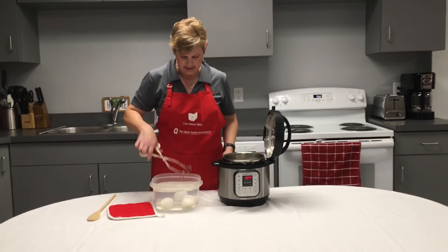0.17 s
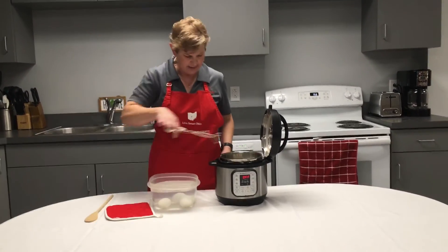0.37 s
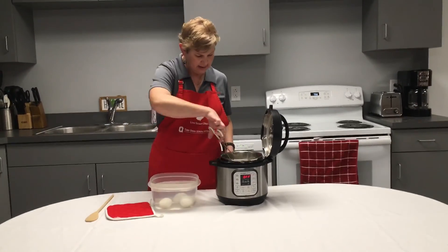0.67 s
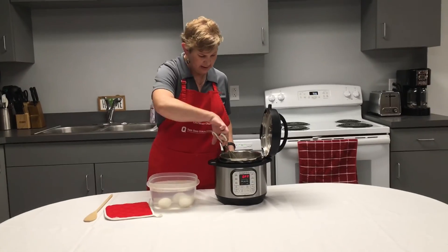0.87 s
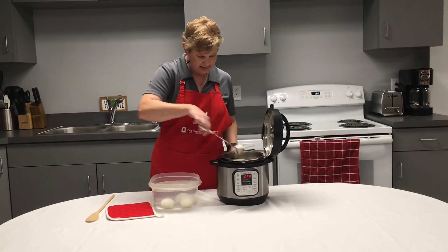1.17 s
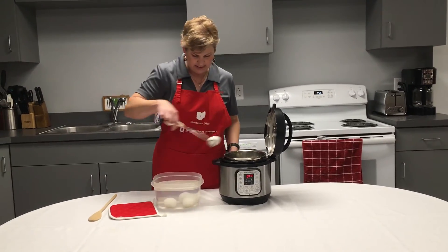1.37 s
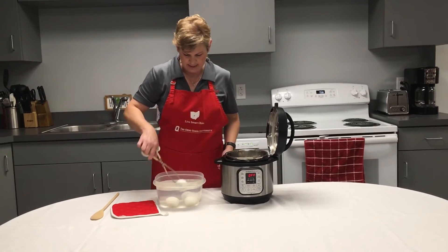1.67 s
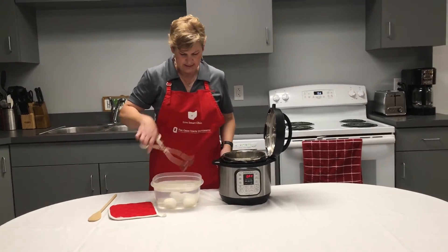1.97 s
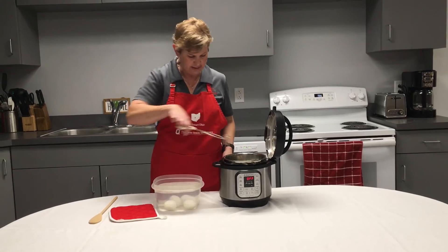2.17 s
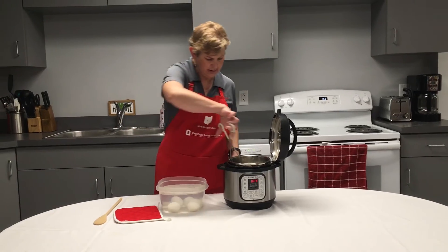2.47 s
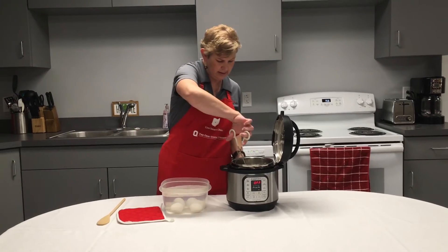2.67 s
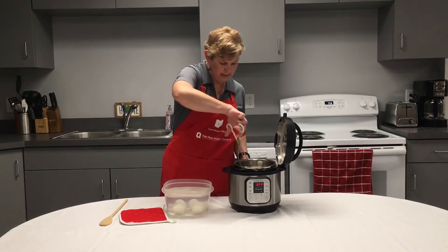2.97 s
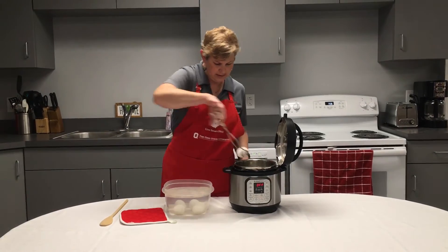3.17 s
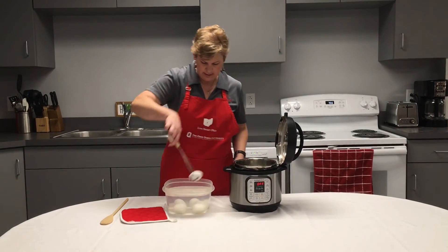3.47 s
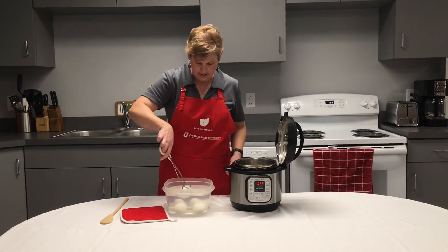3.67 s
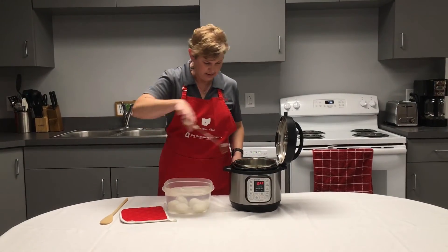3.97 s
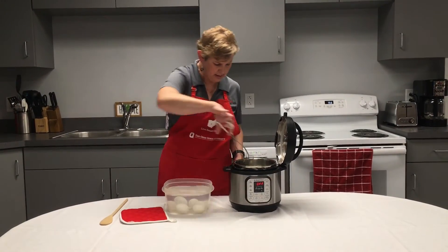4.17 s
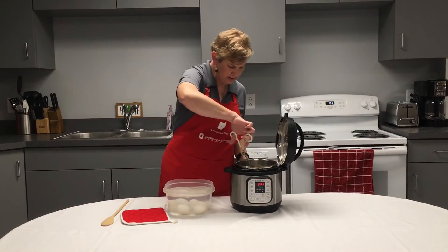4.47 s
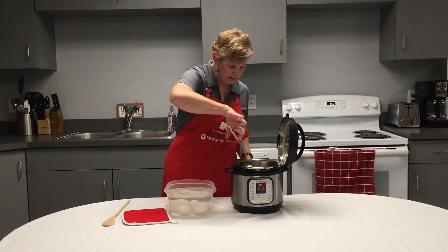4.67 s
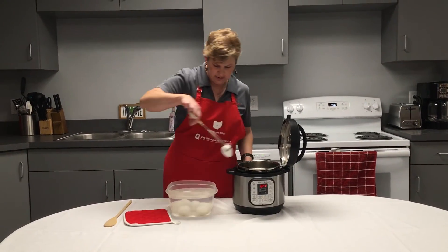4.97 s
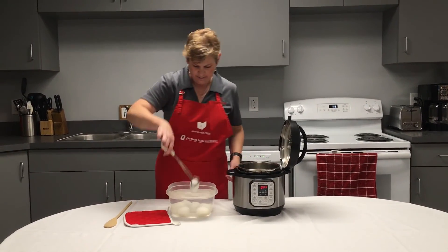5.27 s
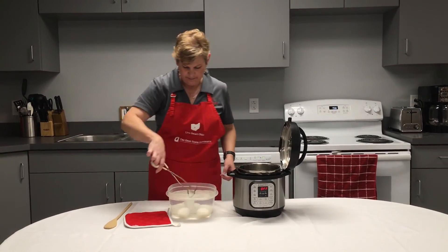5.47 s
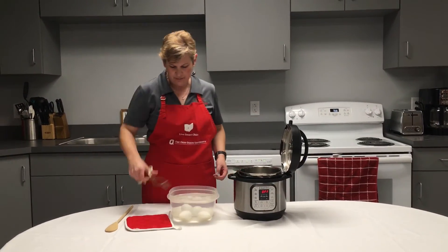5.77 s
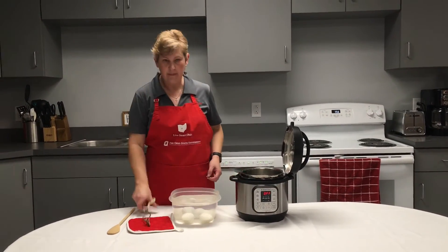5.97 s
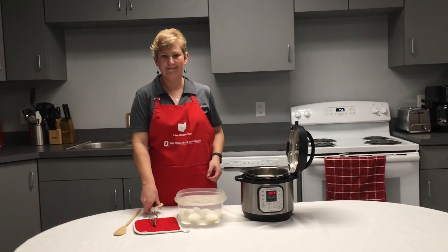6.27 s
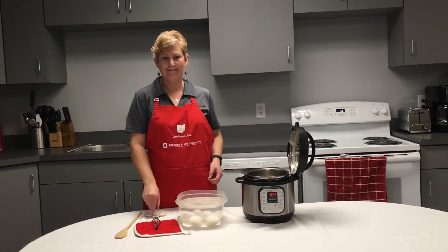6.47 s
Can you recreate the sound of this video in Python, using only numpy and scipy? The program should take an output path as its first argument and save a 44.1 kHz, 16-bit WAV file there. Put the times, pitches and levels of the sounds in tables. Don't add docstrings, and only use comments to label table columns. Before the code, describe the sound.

A low ventilation hum with fuzzy duct tones, soft hiss and a very thin whine runs throughout, in a hard-walled kitchen heard through a small microphone a few metres off. At 0.4 s an egg clicks into a plastic tub of water and rocks, with a soft boom from the table. From 0.75 to 1.1 s steel tongs rattle brightly on a wire rack in a metal pot. A second egg knocks down at 2.2 s. Light scraping at 2.6 s leads to a sharp, ringing clank at 2.7 s, with small settling clinks until 3 s. Faint drips and ticks follow. The third egg lands harder at 4 s; a faint scrape comes around 4.5 s. The last egg drops at 5.65 s with the deepest boom. At 5.8 s the tongs snap shut crisply. At 6.46 s they thud loudly onto the table, arms bouncing and dulling in a quick clatter.

```python
import sys
import numpy as np
from scipy import signal
from scipy.fft import rfft, irfft, next_fast_len
from scipy.io import wavfile
from scipy.ndimage import uniform_filter1d

SR = 44100
rng = np.random.default_rng(int(sys.argv[2]) if len(sys.argv) > 2 else 0)


def unload_wav(signal):
    wavfile.write(
        sys.argv[1],
        SR,
        np.round(np.clip(np.atleast_2d(signal).T, -1, 1) * 32767).astype(np.int16),
    )


def level_to_linear(level):
    exponent = np.asarray(level, float) / 20
    return 10 ** exponent


N = 291942
SPAN = 2 ** 14
HZ, T = np.fft.rfftfreq(2 * SPAN, 1 / SR), np.arange(SPAN) / SR

# frequency [Hz], gain [dB]
MIC_RESPONSE = [(300, 2.5), (4200, -0.5), (4900, -6.5), (5600, 0), (9600, 2.5), (10300, -5.5), (11000, 2),
                (15750, -2.5), (16150, -32), (16600, -42), (17000, -92)]


def unit(x):
    return x / np.sqrt(np.mean(x ** 2) + 1e-20)


def along(points, hz):
    point_hz, value = np.transpose(points)
    return np.interp(np.log(hz + 1), np.log(point_hz + 1), value)


def shaped(x, response):
    return irfft(rfft(x, 2 * SPAN) * response)[:SPAN]


def add(track, start_s, sound):
    piece = track[round(start_s * SR):][:SPAN]
    piece += sound[:len(piece)]


def resonances(peaks, damping):
    centre, width, db = np.transpose(peaks)[:, :, None]
    sign = (-1.) ** np.arange(len(peaks))[:, None]
    loss = 1j * HZ * width * damping
    return sign * level_to_linear(db) * loss / (centre * centre - HZ * HZ + loss)


def struck(modes):
    scatter_db = 2.5 * rng.standard_normal((len(modes), 1))
    return (level_to_linear(scatter_db) * modes).sum(axis=0)


def echo():
    # frequency [Hz], t60 [s]
    kitchen = [(200, 0.92), (700, 0.38), (1500, 0.25), (3000, 0.27), (6000, 0.23), (10000, 0.18),
               (15000, 0.2)]
    _, t, z = signal.stft(rng.standard_normal(SPAN), SR, nperseg=256)
    hz = np.fft.rfftfreq(256, 1 / SR)
    decay = level_to_linear(-60 * t / along(kitchen, hz)[:, None])
    tail = signal.istft(z * decay, SR, nperseg=256)[1][:SPAN] * (T > .006)
    return rfft(tail / np.linalg.norm(tail), 2 * SPAN)


def blow(edges_hz, levels_db, t60, body, rise, crack):
    grain = level_to_linear(2.5 * np.repeat(rng.standard_normal(SPAN // 64), 64))
    swell = grain * level_to_linear(-60 * T / np.clip(t60, .002, 1)) * (1 - np.exp(-T / rise))
    out = np.zeros(SPAN)
    for low_hz, high_hz, db in zip(edges_hz, edges_hz[1:], levels_db):
        band = signal.butter(2, [low_hz, high_hz], "bandpass", fs=SR)
        force = swell * rng.standard_normal(SPAN) + crack * (T == 0)
        part = shaped(signal.lfilter(*band, force), body)
        out += level_to_linear(db) * part / np.abs(part).max()
    return out


def steel(events, peaks, damping, dense_db, room_db, rise, crack):
    edges_hz = (300, 2000, 4500, 10500, 17000)
    out, modes = np.zeros(N), resonances(peaks, damping)
    for s, db, low_db, mid_db, top_db, t60 in events:
        body = struck(modes) + level_to_linear(dense_db)
        hit = blow(edges_hz, db + np.array([low_db, mid_db, 0, top_db]), t60, body, rise, crack)
        add(out, s, hit + level_to_linear(room_db) * shaped(hit, echo()))
    return out


def knocks(events, peaks, order, damping, dense_db, room_db, crack):
    edges_hz = (200, 850, 2000, 4500, 17000)
    out, modes = np.zeros(N), resonances(peaks, damping)
    for s, db, low_db, mid_db, top_db, t60 in events:
        body = struck(modes) ** order + level_to_linear(dense_db)
        hit = blow(edges_hz, db + np.array([low_db, 0, mid_db, top_db]), t60, body, 0.00009, crack)
        add(out, s, hit + level_to_linear(room_db) * shaped(hit, echo()))
    return out


def ringing(notes, rise=0.0012):
    out = np.zeros(N)
    fade = np.cos(np.pi * T / T[-1] / 2)
    for s, hz, db, t60 in notes:
        swell = 1 - np.exp(-(T / rise) ** 2)
        add(out, s, level_to_linear(db - 60 * T / t60) * swell * fade * np.sin(2 * np.pi * hz * T))
    return out


def rack_contacts(rows, peaks, mid_db, top_db, dense_db, room_db, rise):
    wall_fills, wall_dulls = 0.29, 0.43
    events = [(s, db, wall, mid_db + wall_fills * wall, top_db - wall_dulls * wall, t60)
              for s, db, wall, t60 in rows]
    return steel(events, peaks, 1.9, dense_db, room_db, rise, crack=.1)


def pot_and_rack():
    # start_s [s], level_db at 4.5-10 kHz [dB peak], pot_wall_share [dB], t60 [s]
    reach = [(0.7392, -29.5, 2.5, 0.033), (0.7482, -23, -20, 0.14), (0.7641, -27, -9, 0.048),
             (0.8254, -28.5, -20, 0.1), (0.8707, -30, -16, 0.1), (0.893, -33, -23, 0.06),
             (.845, -36, -8, 0.068)]
    grip = [(0.9327, -25, -16.5, 0.083), (0.962, -20.5, -17.5, 0.042), (0.9765, -40, -22, 0.052),
            (1.0312, -17.5, -19.5, 0.047), (1.0403, -24, -17, 0.057), (1.0515, -26, -8.5, 0.077)]
    slide = [(2.5864, -45, 7, 0.08), (2.596, -38.5, -8, 0.032), (2.6382, -44.5, 8.5, 0.06),
             (2.652, -51, 7, 0.045)]
    clank = [(2.6825, -14, -18.5, 0.025), (2.6865, -17, -25, 0.02), (2.693, -17, -33, 0.03),
             (2.6985, -18.5, -12.5, 0.044), (2.706, -20, -12.5, 0.033), (2.74, -37, -1.5, 0.39)]
    settle = [(2.843, -43, 3.5, .03), (2.8498, -30.5, -3.5, 0.072), (2.866, -39, 0, 0.071),
              (2.8841, -35, -6, 0.051), (2.898, -42, -8, 0.054), (2.9103, -44, 3, 0.078),
              (3.0118, -43.5, -6, 0.024), (3.0153, -39.5, -4.5, .04)]
    scrape = [(4.4544, -46, 2, 0.03), (4.462, -31, -12, 0.1), (4.4804, -35.5, 1, 0.045),
              (4.5044, -51, 0, 0.031), (4.5594, -59, 11.5, 0.044)]
    # pitch_hz [Hz], width_hz [Hz], level_db [dB]
    reach_modes = [(1760, 73, -3.5), (2140, 340, -4), (3244, 51, 3.5), (4400, 89, 1.5), (4910, 27, 1),
                   (5200, 19, 1), (5690, 12, 2), (6030, 28, 2), (6500, 47, -7), (7360, 47, -6),
                   (7880, 32, -2), (8160, 250, -3.5), (9160, 27, -12), (8840, 29, -12), (10400, 30, -14),
                   (11400, 43, -4), (12200, 58, -15), (12700, 35, -12), (13300, 27, -7), (13900, 60, -12)]
    grip_modes = [(2570, 140, 0.5), (2930, 100, -1), (3510, 64, -0.5), (4100, 110, -20), (5300, 31, -7),
                  (5470, 50, -16), (6130, 70, -2), (7340, 150, -21), (8400, 30, 0), (8520, 50, -7),
                  (9050, 88, -1), (9160, 37, -12), (9600, 220, -1.5), (10800, 48, -4), (11100, 53, -4),
                  (11600, 35, -1), (11900, 22, -10), (13000, 72, -10), (14000, 55, -11), (14400, 140, 0),
                  (15200, 38, -17)]
    slide_modes = [(965, 11, -18), (1395, 36, 3), (1770, 19, -23), (1960, 90, -9), (2900, 100, -1),
                   (3410, 24, 3), (4300, 23, -4), (5400, 47, -8), (5640, 85, -7), (6300, 39, -7),
                   (7080, 36, -6), (7500, 160, -6), (7740, 29, -16), (8600, 37, 1), (9150, 55, -17),
                   (10700, 37, -13)]
    clank_modes = [(554, 11, -15), (1640, 45, -10), (2700, 150, -4), (3470, 36, 1), (4030, 14, -8),
                   (5370, 28, 1.5), (5530, 24, -7), (6100, 60, -5), (6550, 29, -22), (7150, 33, -10),
                   (7340, 17, 1), (7560, 30, -7), (8200, 33, -6), (8800, 270, 0), (10100, 63, -3),
                   (11100, 32, -15), (11440, 46, -3), (11300, 20, -14), (11500, 31, -7), (11800, 32, -11),
                   (13000, 48, -15), (13000, 28, -9), (13700, 60, -9), (14800, 29, -12)]
    settle_modes = [(965, 20, -12), (1404, 19, 3), (1960, 83, -15), (2900, 100, 4.5), (3360, 32, 0),
                    (4600, 51, 6), (5780, 85, -2), (6200, 39, -6), (7300, 92, -7), (8700, 60, 0),
                    (9200, 63, -5), (11300, 80, -4)]
    scrape_modes = [(880, 10, 0), (1377, 16, 8), (2400, 120, -5), (3900, 110, -5.5), (5560, 110, 2.5),
                    (6460, 41, -4), (6460, 42, -17), (7370, 61, 2.5), (8200, 32, -2), (8480, 46, 2),
                    (9200, 140, -1), (10800, 34, -10), (11300, 50, -2), (13800, 50, -14)]
    # start_s [s], pitch_hz [Hz], level_db
    # [dB], t60 [s]
    wall_notes = [(0.744, 1760, -53, 0.24), (.745, 319, -39, 0.19), (.745, 740, -31.5, 0.038),
                  (.745, 2140, -30, 0.046), (.743, 3150, -40, 0.27), (.75, 3360, -39, .3),
                  (.828, 3330, -53, 0.18), (.83, 4860, -36, .15), (.875, 3160, -42, 0.17),
                  (.934, 3410, -44, 0.2), (1.033, 7340, -30, 0.11), (1.033, 8360, -36, .1),
                  (.94, 568, -47.5, 0.46), (1.034, 285, -32.5, 0.13), (1.04, 2900, -41, 0.28),
                  (2.59, 350, -41, 0.17), (2.59, 880, -48.5, 0.53), (2.69, 1746, -40, 0.59),
                  (2.69, 2930, -43, .3), (2.69, 6072, -39, .28), (2.69, 7165, -37, .21),
                  (2.69, 7500, -46, 0.36), (2.69, 8199, -29, 0.16), (2.69, 11600, -27, 0.13),
                  (2.69, 3500, -41, 0.49), (2.686, 567, -35.5, 0.26), (2.686, 1500, -48, 0.5),
                  (2.684, 5470, -23.5, 0.085), (2.855, 976, -47, 0.72), (2.855, 1716, -52, 0.87),
                  (3.812, 3250, -50, .14), (5.82, 2770, -43, .15), (5.82, 3930, -45, .12),
                  (4.57, 665, -43.5, 0.086)]
    out = ringing(wall_notes)
    out += rack_contacts(reach, reach_modes, -0.9, -15.5, dense_db=-8.5, room_db=-1.5, rise=0.00087)
    out += rack_contacts(grip, grip_modes, -7, -15, dense_db=-5.5, room_db=-1.0, rise=0.0013)
    out += rack_contacts(slide, slide_modes, -9.0, -18, dense_db=-8.5, room_db=-1.5, rise=0.003)
    out += rack_contacts(clank, clank_modes, -6.5, -13, dense_db=-8.0, room_db=-2.0, rise=0.0035)
    out += rack_contacts(settle, settle_modes, -1.5, -12, dense_db=-7, room_db=-2.0, rise=0.0036)
    out += rack_contacts(scrape, scrape_modes, 0.5, -13, dense_db=-9.5, room_db=-5, rise=0.007)
    return out


def eggs_in_tub():
    # start_s [s], level_db at 0.85-2 kHz [dB peak], rock_gap [s], tub_note [dB], table_boom [dB]
    landings = [
        (.382, -28.5, 0.0087, -37, -30),
        (2.176, -29.5, .008, -41, -25),
        (3.963, -24, .0055, -46, -27),
        (5.654, -26.5, 0.01, -35, -21.5),
    ]
    # start_s [s], level_db at 0.85-2 kHz [dB peak]
    nudges = [
        (2.154, -46),
        (3.902, -38.5),
        (6.068, -37.5),
    ]
    # pitch_hz [Hz], width_hz [Hz], level_db [dB]
    tub_modes = [(294, 120, 2.5), (639, 150, 3.5), (887, 210, -5), (1310, 670, -6.5), (2440, 910, -28),
                 (3460, 600, -14)]
    low_db, mid_db, top_db = -8, -5.5, -3.5
    events = [(s, db, 0, -9, -8, 0.043) for s, db in nudges]
    for s, db, gap, _, _ in landings:
        for k in range(3):
            dulled_db = 18 * (k > 0)
            events.append((s + k * gap, db - 4 * k, low_db + 5 * k,
                           mid_db - dulled_db, top_db - dulled_db, 0.033))
    hits = knocks(events, tub_modes, order=1, damping=0.56, dense_db=-19.5, room_db=-9.0, crack=14.1)
    tub_notes = ringing([(s + 0.011, 689, db, 0.15) for s, _, _, db, _ in landings])
    booms = ringing([(s, 80, db, 0.28) for s, _, _, _, db in landings], rise=0.048)
    return hits + tub_notes + booms


def tong_snap():
    # pitch_hz [Hz], width_hz [Hz], level_db [dB]
    shut_modes = [(2780, 300, -16), (3900, 540, 7), (6500, 490, 8.5), (8600, 410, 8), (9400, 300, -2),
                  (11760, 600, 0.5), (12600, 430, 4), (13150, 540, 3.5), (14800, 800, 2), (15400, 550, -1)]
    colour_db = (-24, -11, 14.6)
    events = [(5.8166 + k * .0025, -14.2 - 3 * k * k, *colour_db, .006) for k in range(3)]
    return steel(events, shut_modes, damping=0.7, dense_db=-10.5, room_db=-9, rise=.0003, crack=30)


def laid_tongs():
    # start_s [s], level_db at 0.85-2 kHz [dB peak],
    # relative level of 0.2-0.85, 2-4.5 and 4.5-16 kHz [dB each], t60 [s]
    thud = (6.4592, -2.8, -16, -26, -55, .003)
    # start_s [s], level_db at 0.85-2 kHz [dB peak]
    bounces = [(6.462, -16), (6.4655, -15), (6.4695, -18), (6.4745, -18), (6.4805, -16), (6.4905, -17),
               (6.4935, -22.5), (6.503, -25)]
    # pitch_hz [Hz], width_hz [Hz], level_db [dB]
    table_modes = [(316, 200, -9), (680, 280, -3), (903, 314, 0), (1250, 650, 3), (1860, 630, -3),
                   (2700, 1120, -3.5), (3760, 1400, -8)]
    # start_s [s], pitch_hz [Hz], level_db [dB], t60 [s]
    table_notes = [(6.46, 223, -29, 0.088), (6.476, 180, -30, 0.1), (6.47, 660, -31.5, 0.25),
                   (6.46, 915, -19, .1), (6.46, 800, -25.5, .06), (6.465, 328, -37.5, .15),
                   (6.465, 1405, -24, .09), (6.47, 1215, -32, .12), (6.462, 2000, -32, .04)]
    events = [thud]
    events += [(s, db, -9.5, -14 - 1.2 * k, -38, 0.03) for k, (s, db) in enumerate(bounces)]
    hits = knocks(events, table_modes, order=2, damping=1.43, dense_db=-17.5, room_db=-12.5, crack=22)
    return hits + ringing(table_notes)


def tong_ticks():
    # start_s [s], level_db at 4.5-10 kHz [dB peak], relative level of 2-4.5 and 10-16 kHz [dB each]
    small_ticks = [(0.0014, -40.5, -21, -18), (0.233, -51.5, -1, 6), (1.9263, -49, 6.5, 9),
                   (3.6684, -56, 7, -9), (3.689, -51, -11, -13), (3.7115, -57, -11, -11),
                   (3.8077, -54.5, 13.5, -15), (3.901, -47, 3, -20), (4.1689, -46.5, -8, 0),
                   (4.901, -41.5, -16.5, 2), (4.9412, -45.5, -11, 1), (5.0592, -45.5, -5, -16),
                   (5.6426, -43, -12, -10), (6.0819, -41.5, -13, -4), (6.097, -43.5, -12, 1),
                   (6.41, -38.5, -8, 0)]
    # start_s [s], level_db at 4.5-10 kHz [dB peak], relative level under 4.5 kHz [dB], t60 [s]
    jangles = [
        (5.8174, -19, -19, 0.03),
        (6.4643, -29, -7, 0.076),
        (6.4899, -32.5, 0, 0.02),
    ]
    # start_s [s], pitch_hz [Hz], level_db [dB]
    pings = [(.001, 6600, -53), (.001, 8200, -51), (.233, 3630, -44), (3.016, 5900, -46),
             (3.668, 3320, -54), (3.8075, 3250, -39), (3.8075, 3690, -41.5), (3.8075, 4600, -41),
             (5.06, 4400, -46), (5.817, 2780, -38.5), (5.819, 4300, -39)]
    # pitch_hz [Hz], width_hz [Hz], level_db [dB]
    arm_modes = [(2780, 150, -38), (3940, 32, 3), (6300, 190, 1.5), (9200, 130, -6), (9600, 91, -14),
                 (12040, 110, 8.5), (12600, 180, -3), (12850, 980, 5.5), (14100, 340, 7), (15200, 190, 12)]
    events = [(s, db, -4.5, mid, top, 0.024) for s, db, mid, top in small_ticks]
    events += [(s, db, low, low, 6.5, t60) for s, db, low, t60 in jangles]
    hits = steel(events, arm_modes, damping=2.1, dense_db=1, room_db=-3.5, rise=0.0015, crack=.1)
    return hits + ringing([(*row, 0.039) for row in pings])


def drips():
    # centre [s], level_db [dB peak], pitch_hz [Hz], length [s]
    drops = [(1.403, -55, 708, 0.032), (1.62, -57, 1097, 0.057), (3.282, -55, 1140, 0.044),
             (3.847, -52, 1107, 0.019), (3.873, -52, 1114, 0.016), (4.965, -47, 1113, 0.029),
             (4.996, -50, 1113, 0.015)]
    t, out = np.arange(N) / SR, np.zeros(N)
    for s, db, hz, length in drops:
        swell = np.exp(-(2 * (t - s) / length) ** 4)
        out += level_to_linear(db) * swell * np.sin(2 * np.pi * hz * t)
    return out


def rush(gain, patchy_db):
    z = signal.stft(rng.standard_normal(N + SPAN), nperseg=1024)[2]
    field = uniform_filter1d(uniform_filter1d(rng.standard_normal(z.shape), 5, 0), 8, 1)
    x = signal.istft(z * level_to_linear(patchy_db * unit(field)), nperseg=1024)[1]
    m = next_fast_len(len(x))
    return unit(irfft(rfft(x, m) * gain(np.fft.rfftfreq(m, 1 / SR)), m)[:N])


def whine():
    drift = unit(uniform_filter1d(rng.standard_normal(N), size=2000))
    pitch_hz = 3560 + 11.8 * drift
    return level_to_linear(-71) * np.sin(2 * np.pi * np.cumsum(pitch_hz) / SR)


def ventilation():
    # time [s], level [dB]
    flow = [(0, -46.5), (.6, -46.5), (1.2, -47.5), (1.9, -47.5), (2.3, -47), (3.1, -47), (3.6, -47),
            (4.3, -46.5), (4.9, -47), (5.5, -46.5), (6.1, -46.5), (6.62, -47)]
    # frequency [Hz], density [dB per Hz]
    hum_spectrum = [(13, -47), (22, -34), (49, -6), (76, -12), (102, -3.5), (120, -5), (136, -8),
                    (157, -13.5), (209, -7.5), (312, -12), (349, -21), (409, -13), (503, -41.5),
                    (715, -29.5), (1000, -27.5), (1300, -111), (2200, -120)]
    hiss_spectrum = [(290, -16), (500, -1), (719, -2), (774, -5.5), (1020, -5.5), (1110, -4), (1600, -9.5),
                     (3220, -16), (3670, -14), (4980, -19), (5930, -14.5), (7710, -18), (12500, -17.5),
                     (15100, -18.5), (16200, -29.5)]
    # pitch_hz [Hz], width_hz [Hz], level_db [dB]
    duct_tones = [(120.6, 25, -53), (117.7, 4, -56.5), (208.2, 12, -53)]
    hum_db = np.interp(np.arange(N) / SR, *np.transpose(flow))
    hum = level_to_linear(-2.0) * rush(lambda f: level_to_linear(along(hum_spectrum, f)), patchy_db=2.0)
    for hz, width, db in duct_tones:
        hum += level_to_linear(db + 44.0) * rush(lambda f: 1 / (1 + (2 * (f - hz) / width) ** 2), patchy_db=-1.9)
    hiss = level_to_linear(-56.0) * rush(lambda f: level_to_linear(along(hiss_spectrum, f) - along(MIC_RESPONSE[:-3], f)),
                             patchy_db=.15)
    duct = signal.lfilter(*signal.butter(1, 1510, fs=SR), hiss)
    duct_swing = level_to_linear(6.1 * (hum_db - hum_db.mean())) - 1
    return level_to_linear(hum_db) * hum + hiss + duct * duct_swing + whine()


def scene():
    tongs = pot_and_rack() + tong_snap() + laid_tongs() + tong_ticks()
    return (tongs + eggs_in_tub() + drips() + ventilation())[None]


def band_limit(x):
    return signal.sosfilt(signal.butter(12, 16570, fs=SR, output="sos"), x)


def record(dry):
    m = next_fast_len(N + SPAN)
    response = level_to_linear(along(MIC_RESPONSE, np.fft.rfftfreq(m, 1 / SR)))
    mix = irfft(rfft(dry, m) * response, m)[:, :N]
    return band_limit(mix)


dry = scene()
out = record(dry)
unload_wav(out)
```